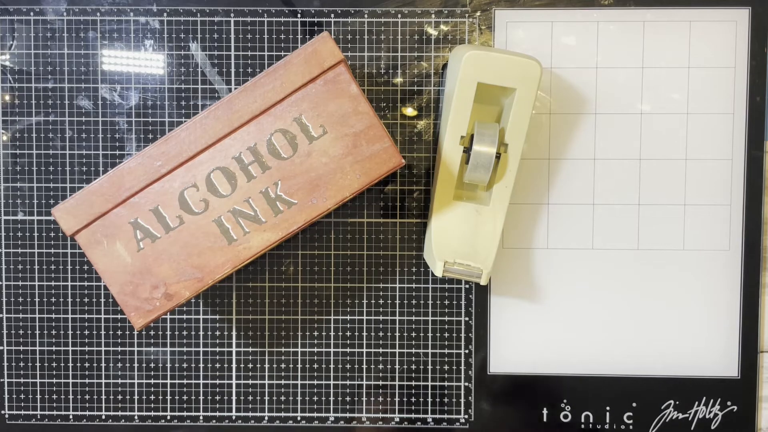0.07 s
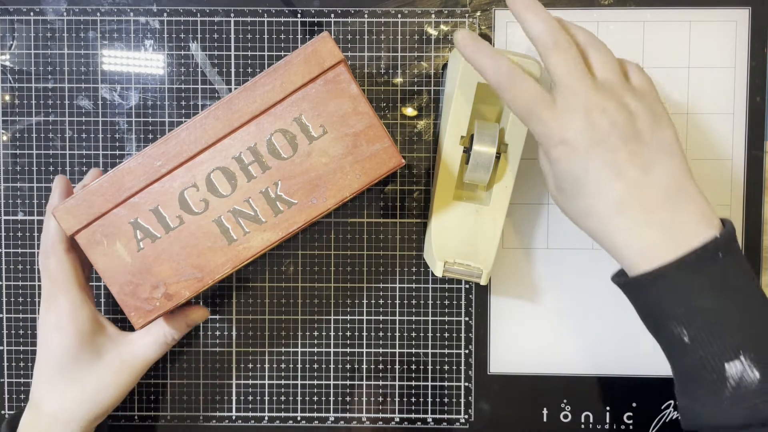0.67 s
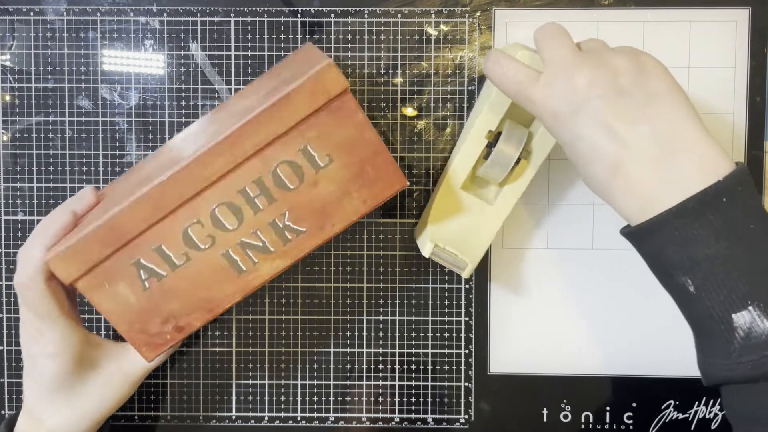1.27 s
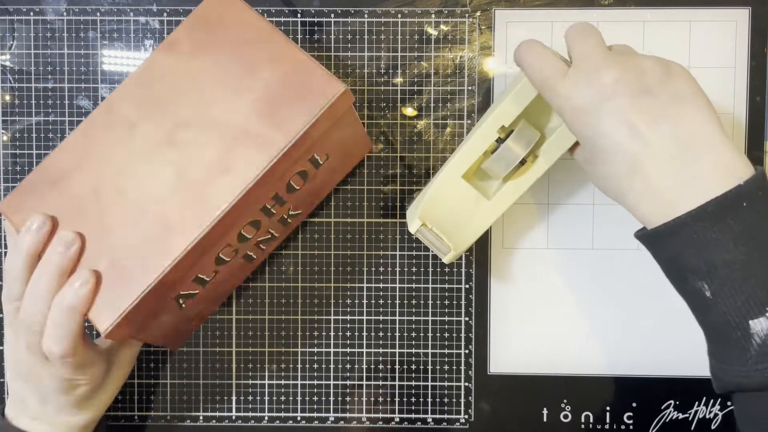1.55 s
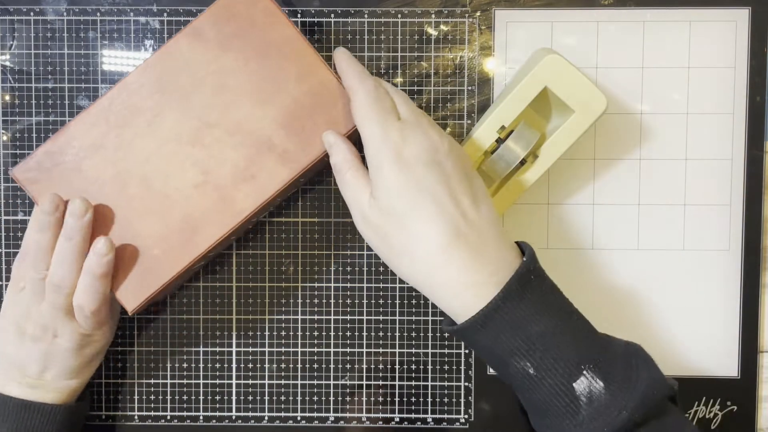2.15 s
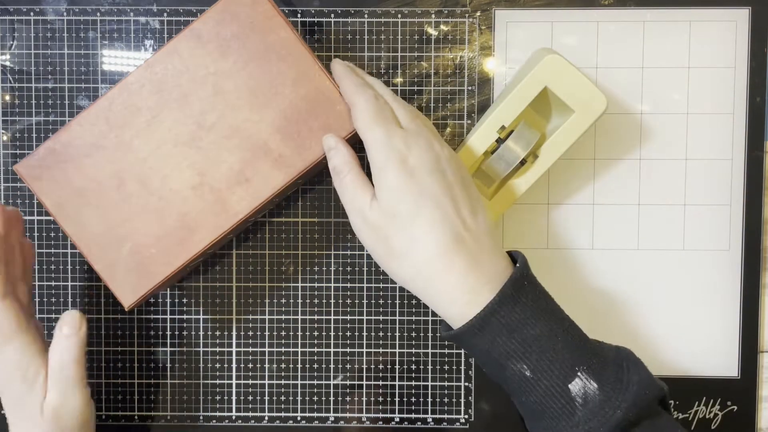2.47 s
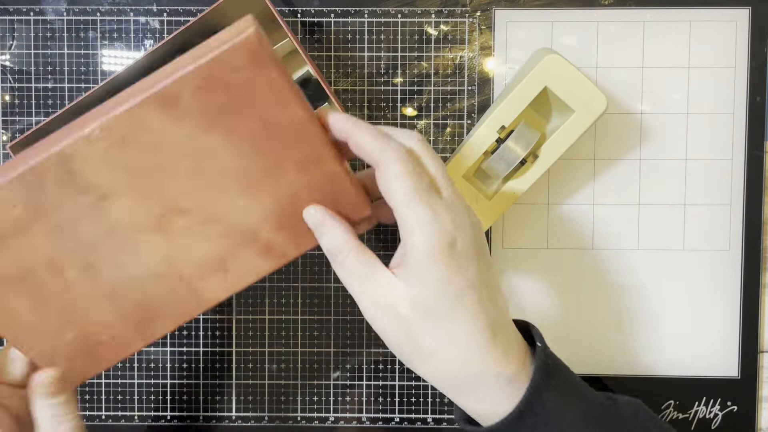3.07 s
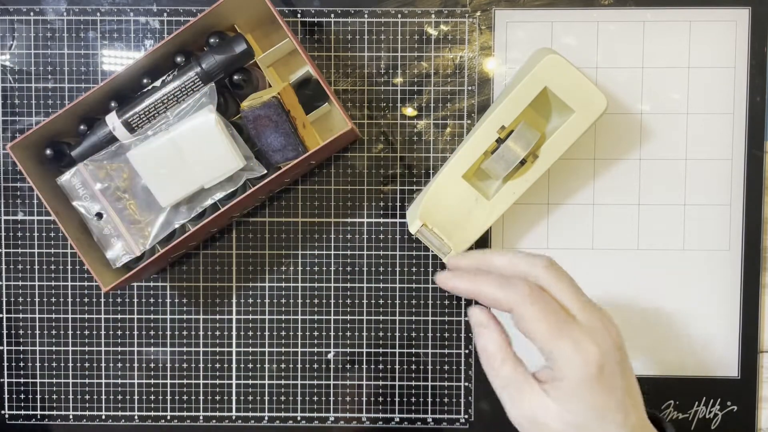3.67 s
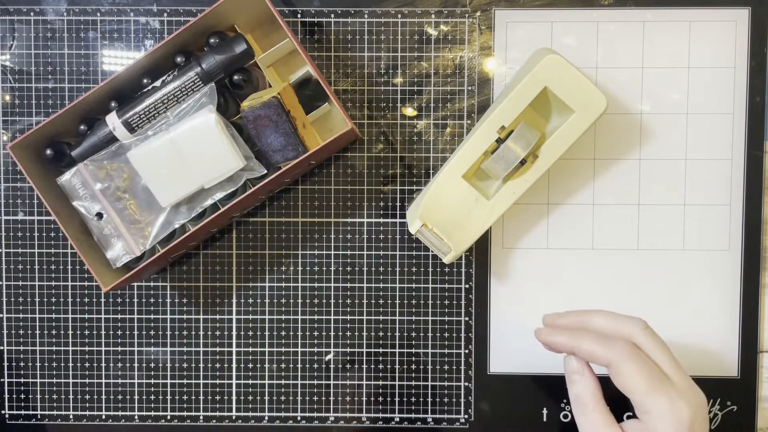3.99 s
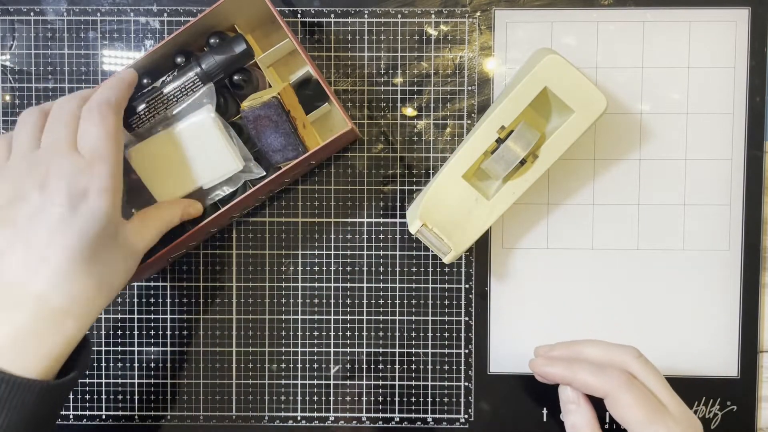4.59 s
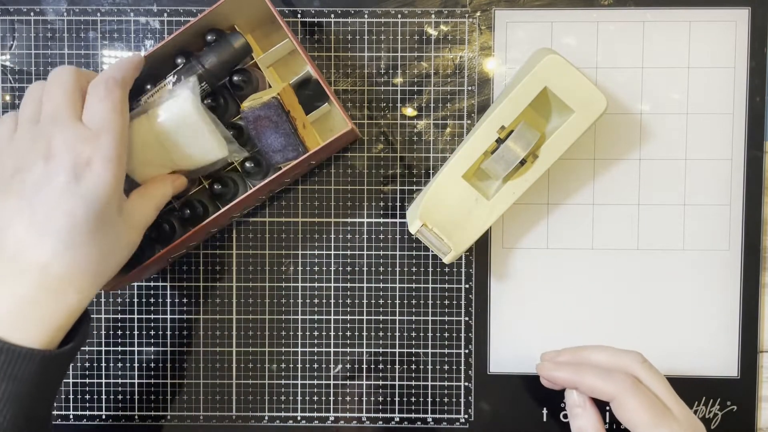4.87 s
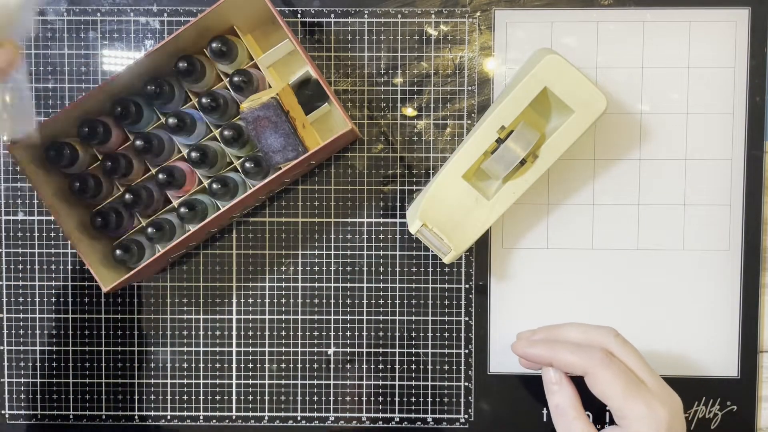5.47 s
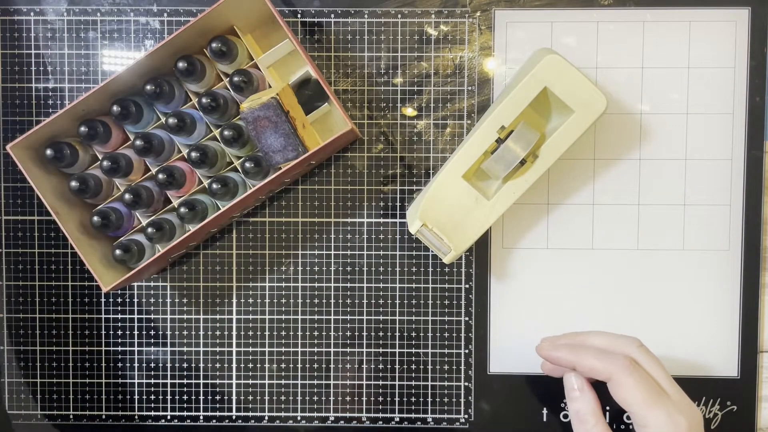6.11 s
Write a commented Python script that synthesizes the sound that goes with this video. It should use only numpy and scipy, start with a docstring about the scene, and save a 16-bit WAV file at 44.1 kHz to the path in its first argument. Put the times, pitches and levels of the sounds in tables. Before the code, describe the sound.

Sleeves brush faintly in a small, quiet room, heard from a phone above a craft table. From about 0.8 to 1.7 seconds a tape dispenser is pushed aside with soft, dull bumps. A storage box starts to tip at 1.3 seconds, knocking more firmly around 1.8 and 2, then lands on its base at 2.3 with a hollow thump, the loudest sound. From 2.6 to 3.5 the lid slides off with a dry card hiss and several bumps. It is set down near 3.9 with two light knocks, small ticks and a low, soft thud. From 4.5 to 5.5 a plastic bag rustles and snaps while the contents tap hollowly in the open box. Around 6 seconds a small hand tool drops with two quick clacks, the second louder, amid more crinkling that ends with a faint bump at 6.3.

```python
"""A lidded storage box of ink bottles is tipped onto its base on a craft table, each impact exciting
damped modes of its panels and the table top. A tape dispenser is pushed aside with soft bumps.
The lid slides off with a frictional hiss and is set down; a plastic bag rustles and snaps, the
contents tap, and a small hand tool drops with two clacks. Sleeves brush and fingernails tick.
A phone above the table hears it in a small, quiet room."""
import sys
import numpy as np
from scipy import signal
from scipy.fft import rfft, irfft, next_fast_len
from scipy.io import wavfile
from scipy.ndimage import uniform_filter1d

SR = 44100
rng = np.random.default_rng(int(sys.argv[2]) if len(sys.argv) > 2 else 0)


def generate_wav(sig):
    """Save sig (samples, or channels by samples) to the path in sys.argv[1] as 16-bit PCM at SR."""
    pcm = np.round(np.clip(np.atleast_2d(sig).T, -1, 1) * 32767).astype(np.int16)
    wavfile.write(sys.argv[1], SR, pcm)


N = 279713
RING_SAMPLES = 32768

# Spectra of the noises and of the struck objects: (frequency [Hz], relative level [dB])
ROOM_SPECTRUM = [(15, -40.5), (25, -12), (76, 1), (180, -11), (451, -10.5), (695, -13.5), (775, -11),
                 (1400, -15), (1790, -20.5), (2480, -29), (2840, -32.5), (5570, -35.5), (7110, -47.5),
                 (10400, -38), (16000, -45.5)]
CLOTH_SPECTRUM = [(100, -8.5), (400, 11.5), (900, -3), (1450, 5.5), (2200, -5), (3000, -22.5), (6000, -30),
                  (12000, -35)]
SNAP_SPECTRUM = [(200, 7), (700, -15), (1500, -13.5), (3000, -14), (5000, -10), (10000, -16), (15000, -21)]
BAG_SPECTRUM = [(710, -58), (1200, -37), (1640, 6.5), (1870, 1), (2150, 12.5), (3950, -5), (5840, -2.5),
                (7490, -31), (8530, -7.5), (16000, -31.5)]
CARD_SPECTRUM = [(700, -34), (1300, -6), (2200, 4), (3500, -3), (5800, -4), (9500, -8.5), (13000, -14),
                 (16000, -4.5)]
OPEN_BOX_SPECTRUM = [(40, -24.5), (130, 0.5), (290, -3), (370, 3.5), (570, -3), (750, -5.5), (1100, -4),
                     (1300, -12), (1550, -9.5), (2050, -37), (2550, -9.5), (3100, -25.5), (5500, -32),
                     (15000, -51.5)]
TOOL_SPECTRUM = [(40, -16), (130, -0.5), (250, -2), (430, -5.5), (560, -5), (800, 8.5), (1000, -3.5),
                 (1200, -4.5), (1700, -12.5), (2050, -8), (2750, -10), (3400, -16.5), (5200, -11.5),
                 (15000, -17.5)]
LID_SPECTRUM = [(35, -54), (55, -18.5), (100, -20.5), (190, -3.5), (330, -6.5), (650, 2), (900, -6),
                (1200, -2.5), (1800, -10), (5500, -23.5), (10000, -33), (15000, -10)]
PANEL_SPECTRUM = [(35, -19.5), (70, 2.5), (200, -3.5), (500, -3), (690, -8.5), (1050, -8.5), (1700, -13),
                  (2750, -18), (3500, -27), (5700, -29), (7000, -34.5), (10000, -37), (15000, -53)]
BASE_SPECTRUM = [(35, -17), (70, -8.5), (140, -2.5), (250, -6), (400, -1.5), (580, -4.5), (690, -15.5),
                 (800, -3.5), (1100, -15.5), (1700, -18), (2750, -12.5), (3500, -23.5), (5700, -21),
                 (10000, -30.5), (15000, -47.5)]
# Stereo width: (frequency [Hz], side gain relative to mid [dB])
STEREO_WIDTH = [(50, -41.5), (140, -30), (300, -11.5), (600, 0.5), (1300, -5.5), (2600, -3.5), (5000, 0.5),
                (10000, -12.5)]
# Microphone ports, a treble notch with a slight sheen above it: (frequency [Hz], gain [dB])
PORT_RESPONSE = [(7000, 0), (7600, -13), (8200, 1.5), (9700, 3), (12000, 0.5), (15500, -5)]

# Normal modes of each object: (frequency [Hz], relative level [dB], decay time T60 [s])
TABLE_MODES = [(55, -21, .6), (56.76, -30, 0.15)]
DISPENSER_MODES = [(365.5, 0, 0.17), (450, -11, 0.14), (518, 9, 0.075), (686, -16, 0.035)]
OPEN_BOX_MODES = [(346, 3.5, 0.12), (397, 0, 0.075), (463, -5, 0.25), (740, -1, 0.12), (921, -7.5, 0.086),
                  (1117, -9, 0.033), (1155, -4.5, 0.064), (1398, -15, 0.11), (1688, -0.5, 0.038),
                  (2410, -9, 0.028)]
TOOL_MODES = [(860, 11.5, 0.032), (2074, -7, 0.12), (2074, -20, 0.12), (2480, -17, 0.16),
              (2500, -16.5, 0.18), (2490, -28, 0.092), (2730, -36, 0.18)]
LID_MODES = [(83.3, -21.5, 0.214), (183.5, -1, 0.058), (327.2, 5, 0.19), (444, 8, 0.095), (502, -5, 0.24),
             (559.3, 3, 0.18), (671, 1.5, 0.13), (770, 7, 0.11), (879, 1, 0.14), (1150, -31, 0.062)]
BOX_MODES = [(93.4, -7, 0.19), (136.3, -7.5, 0.37), (219, -27.5, 0.52), (307, -6.5, .1), (332, -12, 0.13),
             (365.6, -1, 0.04), (362, 3, 0.033), (472.3, -5, 0.17), (499.8, -6.5, .2), (590, -7, 0.16),
             (617, -17.5, 0.2), (760, -7, 0.12), (965, -13, 0.22), (1071.2, -22, 0.36),
             (1260, -29.5, 0.052), (1290, -18.5, .15), (1392, -12.5, .15)]

# Centres and edges of the five registers, thump, body, clack, click and tick: (frequency [Hz])
REGISTER_HZ = [90, 400, 1050, 2400, 8000]
REGISTER_EDGES_HZ = [35, 200, 700, 1800, 5000, 16000]
# Register levels relative to a light snap's level: (clack [dB], click [dB], tick [dB])
NAIL_BALANCE = [-4.5, 0, 0]
SNAP_BALANCE = [-7, 0, -6]
# The same relative to a blow's strength: (thump [dB], body [dB], clack [dB], click [dB], tick [dB])
DISPENSER_BALANCE = [-10.5, -0.5, -18, -32, -40]
CONTENT_BALANCE = [-3, -1, 2.5, -12.5, -25.5]
TOOL_BALANCE = [-12, 0.5, 1, -5, -21.5]
LID_BALANCE = [-3.5, 0, -4.5, -16, -36.5]
BOX_BALANCE = [-8.5, 0.5, -2, -17, -36]
BASE_BALANCE = [-7.5, -1.5, -6, -19, -28.5]

# Envelope of the brushing sleeves: (time [s], level [dB])
SLEEVE_ENVELOPE = [(.05, -105), (.28, -78), (.4, -68.5), (.85, -71), (1.05, -87), (1.5, -94)]
# Ticks of fingernails and card edges, and snaps of the bag: (time [s], relative level [dB])
NAIL_TICKS = [(1.179, -80), (1.302, -73.5), (2.382, -77.5), (2.997, -73.5), (3.861, -67), (3.893, -64.5),
              (4.044, -63.5)]
BAG_SNAPS = [(4.618, -53.5), (4.789, -56), (4.863, -56.5), (4.928, -54), (5.016, -55), (5.04, -56.5),
             (5.078, -48), (5.092, -47.5), (5.243, -58.5), (5.299, -55), (5.383, -66.5), (5.392, -50.5),
             (5.464, -58.5), (5.817, -68), (5.895, -62), (5.907, -56), (6.01, -51.5), (6.292, -55.5)]
# Rubbing of plastic and of card: (time [s], duration [s], relative hiss [dB], relative rumble [dB])
BAG_STROKES = [(4.48, 0.085, -66.5, -44), (4.7, 0.14, -72, -52), (4.8, .14, -61, -45.5),
               (4.99, 0.19, -69, -47), (5.255, 0.036, -65, -47.5), (5.38, 0.041, -68, -77),
               (5.51, 0.067, -76, -76), (5.92, 0.18, -57, -46), (6.18, .12, -63, -53)]
CARD_STROKES = [(1.72, 0.43, -80, -56), (2.0, 0.17, -67, -60.5), (2.17, 0.25, -66, -53.5),
                (2.36, 0.29, -83, -61), (2.61, 0.39, -66, -53.5), (2.72, 0.047, -56.5, -55),
                (2.87, 0.034, -53.5, -47), (3.0, .19, -67.5, -69), (3.17, 0.15, -56.5, -57.5),
                (3.46, 0.11, -62.5, -81), (3.91, 0.16, -66.5, -54.5)]
# The lid's weight coming to rest on the table: (time [s], peak level [dB])
TABLE_THUDS = [(4.068, -36.5)]
# Blows: (time [s], relative strength [dB], weight added to thump [dB], hardness added to treble [dB])
DISPENSER_BUMPS = [(0.776, -58, -1.5, -15), (1.002, -60, 4, 6.5), (1.037, -47, 2.5, 2),
                   (1.24, -45, -10, 0.5), (1.728, -51.5, 5, 8)]
CONTENT_TAPS = [(4.498, -49.5, 11.5, -7), (4.53, -51.5, 10, 2), (4.553, -53.5, 5, 9.5),
                (4.688, -40.5, -4.5, 10.5), (4.77, -53, 1, -15), (4.818, -48.5, -4, -4.5),
                (4.92, -52.5, 3, -5), (5.016, -43, -1, -11), (5.039, -44.5, -12, -9), (5.058, -44, -9, -12),
                (5.097, -36.5, -6.5, 0)]
TOOL_DROPS = [(5.95, -34, 8, 11.5), (6.107, -21.5, 0.5, 0)]
LID_BUMPS = [(2.625, -37.5, 3, -2.5), (2.678, -44.5, -8, -3), (2.737, -29.5, -3.5, -2.5),
             (2.782, -38, -10.5, -4.5), (2.927, -50, 9, 5), (3.225, -56, 9.5, -3),
             (3.861, -35, -7.5, -10.5), (3.892, -33.5, -6.5, -5.5), (4.046, -50, 11, 3),
             (6.302, -47.5, -2, -32)]
BOX_KNOCKS = [(1.301, -46, -2, 3.5), (1.445, -46, -13, -1), (1.481, -35, 2.5, 3.5), (1.781, -49.5, -6, 7),
              (1.816, -28.5, -2.5, -7), (1.829, -28.5, -1.5, -2), (2.0, -28, 3.5, -1),
              (2.056, -37.5, 2.5, -2), (2.118, -39, 2, -10), (2.147, -48, 0, -14), (2.222, -64, -1.5, 4.5),
              (2.469, -44, -21, -26)]
BOX_LANDING = [(2.279, -8.5, -3, -2.5)]


def undb(db):
    """Amplitude ratio of a level in decibels."""
    return 10 ** (np.asarray(db) / 20)


def rms(x):
    """Root-mean-square amplitude."""
    return np.sqrt(np.mean(x ** 2)) + 1e-12


def band(x, lo, hi):
    """Causal Butterworth band-pass."""
    return signal.sosfilt(signal.butter(3, [lo, hi], "bandpass", fs=SR, output="sos"), x)


def colour(x, points):
    """Minimum-phase filtering through (frequency [Hz], gain [dB]) points."""
    size = 2 * next_fast_len(x.shape[-1] // 2 + 1)
    hz, db = np.transpose(points)
    bin_hz = np.arange(size // 2 + 1) * SR / size
    gain = undb(np.interp(np.log(bin_hz + 1), np.log(hz), db))
    cepstrum = irfft(np.log(gain))
    cepstrum[1:size // 2] *= 2  # folding the cepstrum makes the filter causal
    cepstrum[size // 2 + 1:] = 0
    return irfft(rfft(x, size) * np.exp(rfft(cepstrum)), size)[..., :x.shape[-1]]


def stereo(mid, side):
    """Interchannel coherence: left and right are alike in the bass, further apart above it."""
    side = colour(side, STEREO_WIDTH)
    return np.array([mid + side, mid - side])


def fade(t, t60):
    """Exponential damping: 60 dB in t60 seconds."""
    return np.exp(-np.log(1000) * t / t60)


def wander(changes_per_s):
    """Slow random modulation of unit RMS."""
    hold = int(SR / changes_per_s)
    steps = np.repeat(rng.standard_normal(N // hold + 1), hold)
    drift = uniform_filter1d(steps, hold)[:N]
    return drift / rms(drift)


def add(out, start_s, sound):
    """Superposition of a sound at its onset time."""
    i = int(start_s * SR)
    out[:, i:i + sound.shape[1]] += sound[:, :N - i]


def flutter(x, round_trip_s=0.0047, trip_db=-14):
    """Flutter echo: repeated reflection between the table top and the surface above it."""
    size = 2 * next_fast_len(x.shape[-1] // 2 + 1)
    delay = np.exp(-2j * np.pi * np.arange(size // 2 + 1) * SR / size * round_trip_s)
    return irfft(rfft(x, size) / (1 - undb(trip_db) * delay), size)[..., :x.shape[-1]]


def clatter(t, t60, room_db):
    """Modal overlap: dense modes merge into noise whose lows outlast its highs; settings hold at 1 kHz."""
    out = 0
    noise = rfft(rng.standard_normal((2, len(t))))
    bin_hz = np.arange(noise.shape[1]) * SR / len(t)
    octave = np.log2(np.clip(bin_hz, 62.5, 16000) / 62.5)
    for k, room_t60 in enumerate(np.linspace(0.42, 0.16, 9)):
        hz = 62.5 * 2 ** k
        octave_noise = irfft(noise * np.maximum(1 - abs(octave - k), 0))
        direct = fade(t, t60 * (1000 / hz) ** 0.553) * (1 - np.exp(-t * hz))
        room = undb(room_db) * (1000 / hz) ** .1 * fade(t, room_t60) * (1 - np.exp(-t / .006))
        envelope = np.hypot([direct, 0.55 * direct], room)  # mid and side: the direct sound is narrow
        out = out + octave_noise * envelope * (hz / 1000) ** 0.28
    return stereo(*out)


def ring(t, modes):
    """Free vibration: damped sinusoids, a little different at each blow, spread into the room."""
    out, spread = 0, 1 - 0.9 * np.exp(-t / .05)
    for k, (hz, db, t60) in enumerate(modes):
        detune, excitation, side_gain, side_phase = rng.standard_normal(4)
        phase = 2 * np.pi * hz * (1 + 0.0029 * detune) * t
        build = 1 - np.exp(-t * hz / 0.53)
        amplitude = (-1) ** k * undb(db + 1.1 * excitation) * fade(t, t60) * build
        side = spread * side_gain * np.sin(phase + np.pi * side_phase)
        out = out + amplitude * np.array([np.sin(phase), side])
    return stereo(*out)


def voice(blow, levels_db, attack_s=.025):
    """Spectral balance: the contact sets each register's attack level; snaps use only the upper ones."""
    registers = list(zip(REGISTER_HZ, REGISTER_EDGES_HZ, REGISTER_EDGES_HZ[1:]))[-len(levels_db):]
    for _ in range(2):  # two passes, since the bands overlap
        attack = blow[:, :int(attack_s * SR)].mean(axis=0)
        gains = [(hz, db - 20 * np.log10(rms(band(attack, lo, hi))))
                 for (hz, lo, hi), db in zip(registers, levels_db)]
        blow = colour(blow, gains)
    return blow


def blow_levels(balance, knee_hz, strength_db, weight_db, hardness_db):
    """Impact spectrum: weight feeds the thump; hardness takes effect over the octave above the knee."""
    treble = np.clip(np.log2(np.array(REGISTER_HZ) / knee_hz), 0, 1)
    thump = np.arange(len(REGISTER_HZ)) == 0
    return strength_db + np.array(balance) + weight_db * thump + hardness_db * treble


def knocks(rows, modes, spectrum, balance, modes_db, t60, room_db, gain_db, contact_s, pan_db,
           knee_hz=420):
    """Impact excitation: each blow sounds an object's distinct modes and the clatter of its panels."""
    out, t = np.zeros((2, N)), np.arange(RING_SAMPLES) / SR
    push = 1 - np.exp(-t / contact_s)  # the force builds while the surfaces give
    for start_s, *contact in rows:
        dense = colour(flutter(push * clatter(t, t60, room_db)), spectrum)
        clear = ring(t, modes)
        blow = dense / rms(dense) + undb(modes_db) * clear / rms(clear)
        add(out, start_s, voice(blow, blow_levels(balance, knee_hz, *contact)))
    return out * undb(gain_db + np.array([[pan_db / 2], [-pan_db / 2]]))


def clicks(rows, balance, t60, room_db, gain_db):
    """Brief impulses have broad spectra: bright snaps, too light to move the box."""
    out, t = np.zeros((2, N)), np.arange(RING_SAMPLES // 2) / SR
    for start_s, db in rows:
        snap = clatter(t, t60, room_db) * (1 - np.exp(-t / 0.00015))
        snap = colour(flutter(snap), SNAP_SPECTRUM)
        add(out, start_s, voice(snap, db + np.array(balance)))
    return out * undb(gain_db)


def strokes(starts_s, lengths_s, levels_db, attack_s, release_t60):
    """Incoherent summation: strokes swell, hold and decay, adding in power."""
    now, power = np.arange(N) / SR, 0
    for start_s, length_s, db in zip(starts_s, lengths_s, levels_db):
        swell = np.clip((now - start_s) / attack_s, 0, 1)
        release = fade(np.maximum(now - start_s - length_s, 0), release_t60)
        power = power + (undb(db) * swell * release) ** 2
    return np.sqrt(power)


def rubbing(rows, surface, walls, slips_per_s, spread_db, smooth, hiss_db, rumble_db, attack_s, hiss_t60):
    """Stick-slip friction: tiny random slips hiss at the surface and shake the box walls."""
    t = np.arange(RING_SAMPLES // 2) / SR
    slips = rng.random(N) < slips_per_s / SR
    slips = slips * undb(spread_db * np.minimum(rng.exponential(size=N), 4)) * rng.choice([-1, 1], N)
    grains = signal.fftconvolve(slips[None], clatter(t, t60=0.0064, room_db=-17.5), axes=1)[:, :N]
    force = flutter(grains / rms(grains) + smooth * stereo(*rng.standard_normal((2, N))))
    hiss, rumble = colour(force, surface), colour(force, walls)
    hiss /= rms(band(hiss, 3000, 15000))
    rumble /= rms(band(rumble, 300, 1800))
    starts_s, lengths_s, hiss_levels, rumble_levels = np.transpose(rows)
    hiss *= strokes(starts_s, lengths_s, hiss_db + hiss_levels, attack_s, hiss_t60)
    rumble *= strokes(starts_s, lengths_s, rumble_db + rumble_levels, attack_s, release_t60=.25)
    hand_pressure = undb(3.5 * wander(55))
    return (hiss + rumble) * hand_pressure


def room_tone(level_db=-69):
    """Ambient noise: faint, dull and nearly stationary."""
    air = colour(stereo(*rng.standard_normal((2, N))), ROOM_SPECTRUM)
    return air / rms(air) * undb(level_db + .6 * wander(7))


def sleeves(flicker_db=2):
    """Friction noise: cloth brushes softly as the arms reach forward."""
    cloth = colour(stereo(*rng.standard_normal((2, N))), CLOTH_SPECTRUM)
    level_db = np.interp(np.arange(N) / SR, *np.transpose(SLEEVE_ENVELOPE))
    return cloth / rms(cloth) * undb(level_db + flicker_db * wander(23))


def nail_ticks():
    """Light impacts of fingernails and card edges radiate short ticks."""
    return clicks(NAIL_TICKS, NAIL_BALANCE, t60=0.05, room_db=-10, gain_db=0.5)


def bag_snaps():
    """Impulsive radiation from snapping plastic film."""
    return clicks(BAG_SNAPS, SNAP_BALANCE, t60=0.026, room_db=-17, gain_db=-1)


def bag_rustle():
    """Sparse, uneven frictional slips of plastic drive the open box."""
    return rubbing(BAG_STROKES, BAG_SPECTRUM, OPEN_BOX_SPECTRUM, slips_per_s=200, spread_db=3,
                   smooth=0.24, hiss_db=-3, rumble_db=-7, attack_s=0.019, hiss_t60=0.18)


def card_slide():
    """Sliding friction of card on the mat and lid on box: dense, equal slips."""
    return rubbing(CARD_STROKES, CARD_SPECTRUM, PANEL_SPECTRUM, slips_per_s=800, spread_db=0,
                   smooth=0.76, hiss_db=-1.5, rumble_db=-6, attack_s=0.029, hiss_t60=0.21)


def table_thuds(lid_mode=(192, -12.5, 0.14)):
    """A soft impact excites only low modes: those of the table top and one of the lid."""
    out, t = np.zeros((2, N)), np.arange(RING_SAMPLES) / SR
    for start_s, db in TABLE_THUDS:
        thud = ring(t, TABLE_MODES + [lid_mode])
        add(out, start_s, thud / abs(thud).max() * undb(db))
    return out


def dispenser_bumps():
    """Compliant contact: the force rises slowly and the tape dispenser bumps dully."""
    return knocks(DISPENSER_BUMPS, DISPENSER_MODES, PANEL_SPECTRUM, DISPENSER_BALANCE,
                  modes_db=-6.5, t60=0.044, room_db=-14.5, gain_db=-1, contact_s=0.0042, pan_db=1.5)


def content_taps():
    """Resonance of the open box gives the taps of its contents a hollow ring."""
    return knocks(CONTENT_TAPS, OPEN_BOX_MODES, OPEN_BOX_SPECTRUM, CONTENT_BALANCE, knee_hz=886,
                  modes_db=0.5, t60=0.035, room_db=-17.5, gain_db=-.5, contact_s=0.00012, pan_db=0.3)


def tool_drops():
    """Collision: the falling tool excites its own modes with those of lid and table."""
    return knocks(TOOL_DROPS, LID_MODES + TOOL_MODES + TABLE_MODES, TOOL_SPECTRUM, TOOL_BALANCE,
                  knee_hz=1026, modes_db=2, t60=0.043, room_db=-16, gain_db=0.5, contact_s=0.0011,
                  pan_db=0.5)


def lid_bumps():
    """Panel vibration of the lid as it is lifted, set down and jostled by the tool."""
    return knocks(LID_BUMPS, LID_MODES + TABLE_MODES, LID_SPECTRUM, LID_BALANCE,
                  modes_db=0, t60=0.046, room_db=-13, gain_db=-2, contact_s=0.00049, pan_db=0.6)


def tipping_box():
    """Modal response of box and table: knocks while it tips, a full ring as it lands on its base."""
    modes = BOX_MODES + TABLE_MODES
    tipping = knocks(BOX_KNOCKS, modes, PANEL_SPECTRUM, BOX_BALANCE,
                     modes_db=-4, t60=.048, room_db=-16.5, gain_db=0.5, contact_s=0.00092, pan_db=0)
    landing = knocks(BOX_LANDING, modes, BASE_SPECTRUM, BASE_BALANCE,
                     modes_db=-0.5, t60=0.052, room_db=-15.5, gain_db=-1, contact_s=0.00054, pan_db=0.5)
    return tipping + landing


def scene():
    """Linear superposition of impacts, handling noise and the quiet room."""
    impacts = tipping_box() + dispenser_bumps() + lid_bumps() + tool_drops() + content_taps()
    handling = table_thuds() + bag_snaps() + nail_ticks() + card_slide() + bag_rustle() + sleeves()
    return impacts + handling + room_tone()


def record(dry, right_lag_samples=.5, cutoff_hz=16000):
    """Filtering and path delay: the phone's ports colour the treble, the right one lying further off."""
    left, right = colour(dry, PORT_RESPONSE)
    size = 2 * next_fast_len(N // 2 + 1)
    delay = np.exp(-2j * np.pi * np.arange(size // 2 + 1) / size * right_lag_samples)
    heard = np.array([left, irfft(rfft(right, size) * delay, size)[:N]])
    low_pass = signal.ellip(8, .2, 70, cutoff_hz, fs=SR, output="sos")
    return signal.sosfilt(low_pass, np.clip(heard, -1, 1))


dry = scene()
out = record(dry)
generate_wav(out)
```